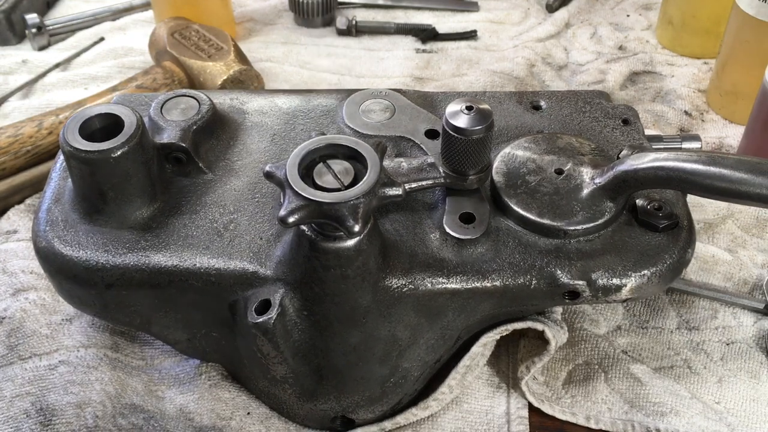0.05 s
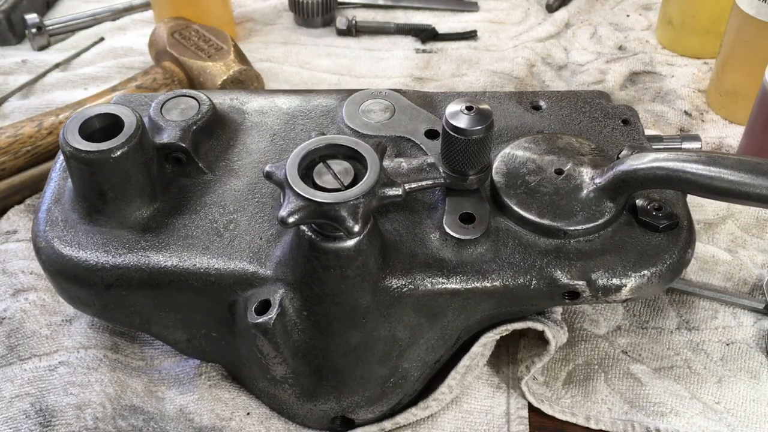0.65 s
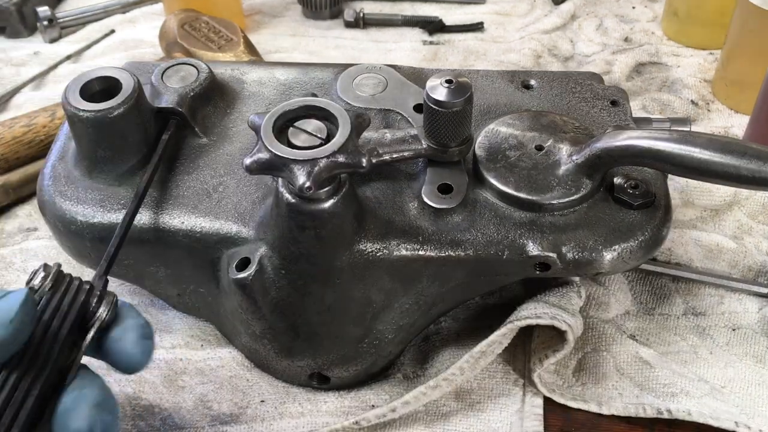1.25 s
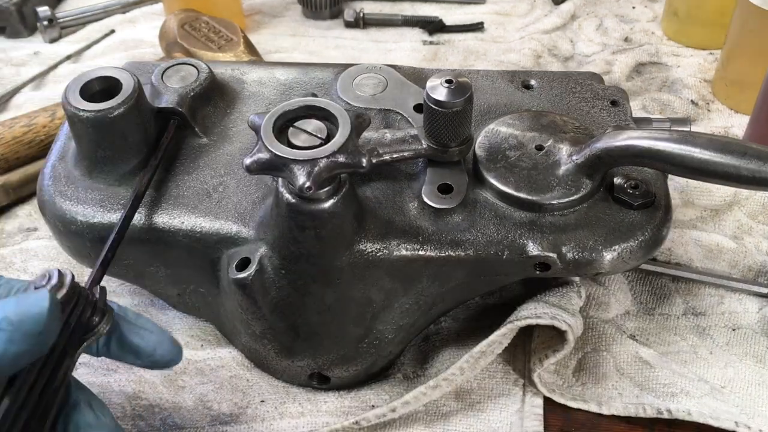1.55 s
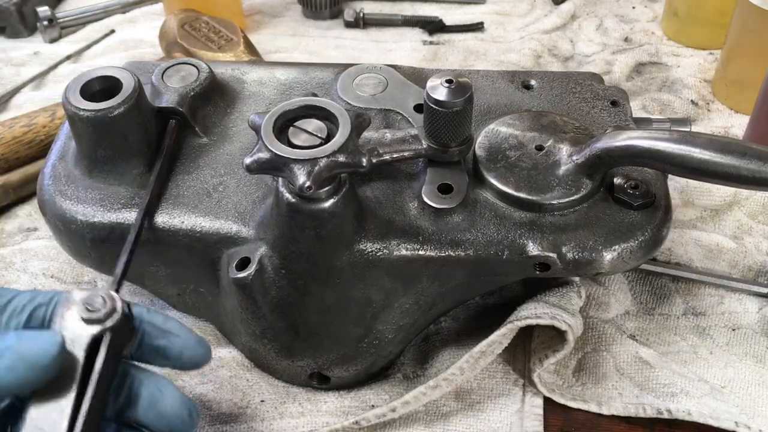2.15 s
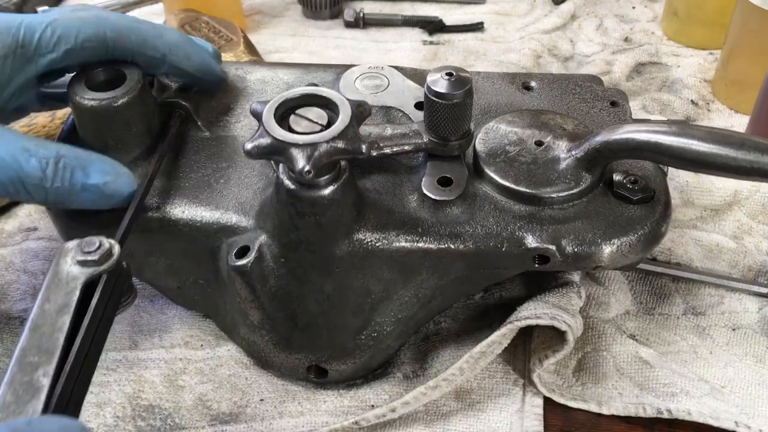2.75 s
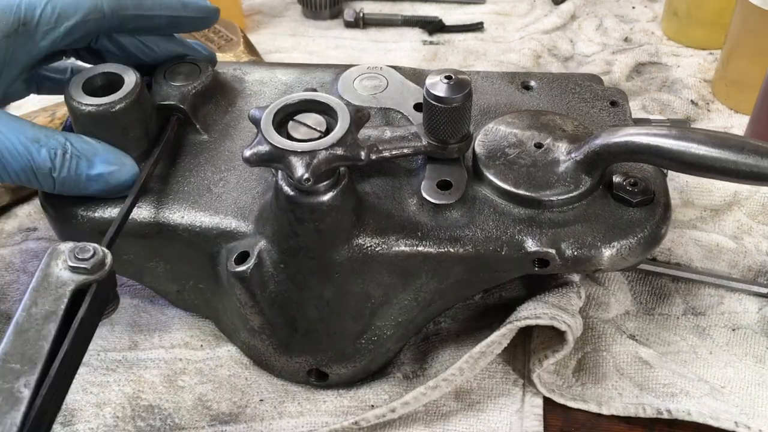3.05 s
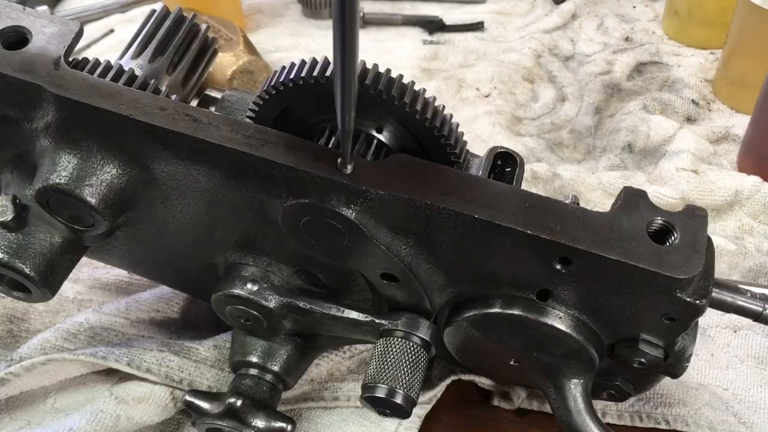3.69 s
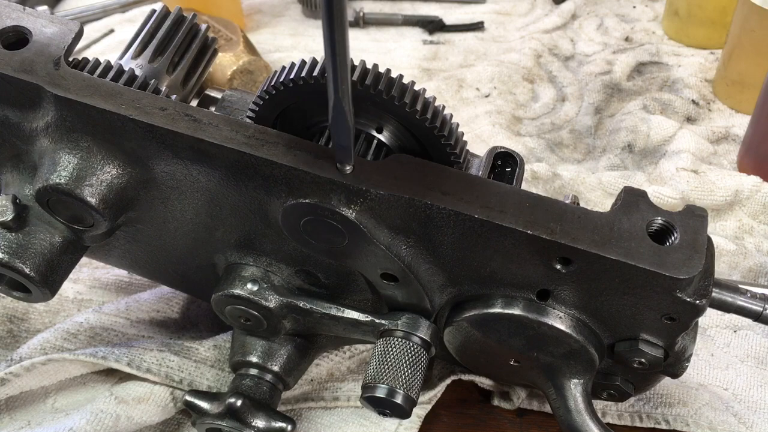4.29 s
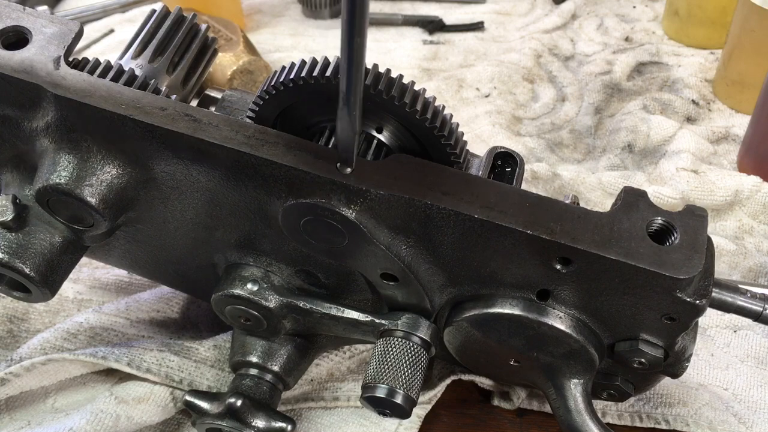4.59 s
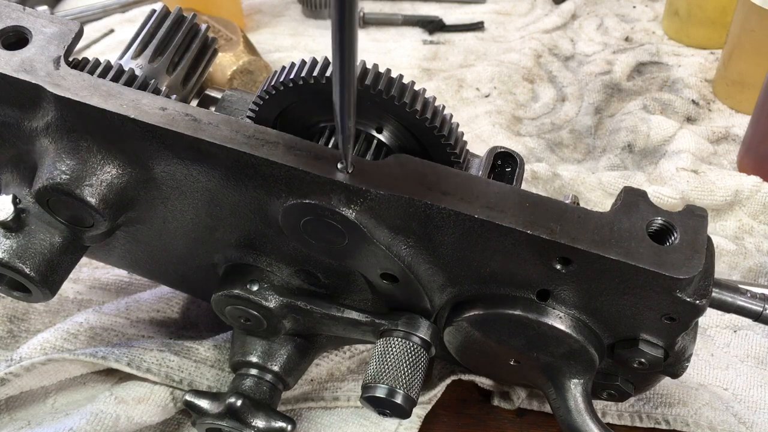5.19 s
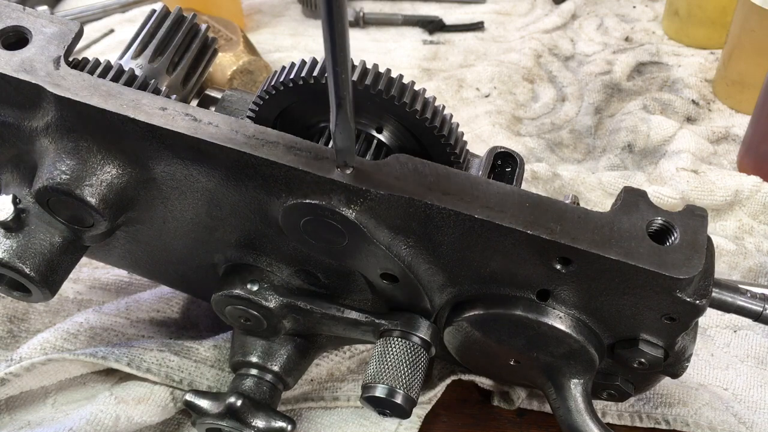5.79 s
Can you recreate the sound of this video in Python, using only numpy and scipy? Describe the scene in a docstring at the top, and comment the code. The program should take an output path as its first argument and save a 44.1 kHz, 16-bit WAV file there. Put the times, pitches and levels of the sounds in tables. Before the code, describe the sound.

A hex key cracks a screw loose in cast iron with one sharp snap, then a tool faintly clicks and scrapes.

```python
"""A tight set screw in a cast-iron gearbox creaks under a folding hex key, then snaps loose.
The thread sticks and slips to make the creak; the snap sets key and iron ringing, and the small
workshop answers. The tool ticks and scrapes, gloved hands rub and slide, and something knocks on
the bench, over a low room hum. The gearbox lies on a cloth, close to the microphone."""
import sys
import numpy as np
from scipy import signal
from scipy.fft import rfft, irfft, next_fast_len
from scipy.io import wavfile
from scipy.ndimage import uniform_filter1d, map_coordinates

SR = 44100
rng = np.random.default_rng(int(sys.argv[2]) if len(sys.argv) > 2 else 0)


def master(y):
    """Save y as 16-bit WAV."""
    cut = np.clip(np.atleast_2d(y).T, -1, 1)
    pcm = np.round(cut * 32767)  # scale
    wavfile.write(sys.argv[1], SR, pcm.astype(np.int16))


N = 261998

# The quick jolts as the screw lets go: delay_s, level_db
JOLTS = [(0, -16), (.0008, -14), (.0024, -19)]
# The tone colour of each crack: pitch_hz, level_db
CRACK_COLOUR = [(100, -39), (400, -24.5), (620, -15.5), (900, -19), (1250, -9.5), (1650, -0.5),
                (2000, -5.5), (2450, -2), (3200, 4), (4200, -4.5), (5000, -3), (6700, -5), (7700, -14),
                (9000, -7.5), (10400, -14), (12500, -6), (16000, -14)]
# The notes of key and iron together: pitch_hz, level_db, fade_s (time to fall by 60 dB)
IRON_NOTES = [(1546, -13, .06), (1725, -11, .04), (1720, -17.5, 0.023), (2341, -27, .28), (2448, 1, 0.053),
              (2572, -14, 0.084), (2944, -11, .025), (3064, -7.5, 0.051), (3300, -16.5, .035),
              (3400, -16.5, .035), (3567, 7, 0.028), (3576, -24.5, 0.41), (3710, -11.5, 0.034),
              (4160, -19, .03), (4780, -5.5, 0.022), (5030, -12, .02), (5980, -8.5, .04), (5800, -35, .3),
              (6055, -16.5, .03), (6520, -9, 0.025), (6557, -30.5, 0.22), (6700, -16.5, 0.036),
              (7246, -27, .022), (8220, -7, .035), (9160, -21.5, .022), (12900, -22, .02)]


def snap(start_s=0.4994, ring_db=-14, crack_fade_s=0.021, build_s=0.00052):
    """Each jolt of the screw cracks; together they set key and iron ringing."""
    out, t = np.zeros(N), clock(SR // 2)
    for delay, db in JOLTS:
        add(out, start_s + delay, amp(db - 60 * t / crack_fade_s) * noise(CRACK_COLOUR, len(t)))
    build_up = 1 - np.exp(-(t / build_s) ** 2)
    add(out, start_s, amp(ring_db) * build_up * ring(IRON_NOTES, t))
    return room(out, echo_db=-14.5, build_s=0.0049)


# The small slips of the thread: start_s, level_db
SLIPS = [(.131, -41), (0.138, -46), (0.142, -39.5), (0.148, -36), (0.151, -32), (0.1561, -32.5),
         (0.1607, -34.5)]
# The notes of the strained key: pitch_hz, level_db, fade_s
KEY_NOTES = [(1688, -8, 0.017), (2103, -8, .025), (2350, 0.5, .024), (2635, -11, 0.039),
             (3670, -13.5, 0.028), (5360, -15, .006)]
# The tone colour of rubbed iron: pitch_hz, level_db
IRON_COLOUR = [(900, -10.5), (1600, -4.5), (2100, 0.5), (2600, -5.5), (3000, -5), (3500, -10), (4200, -8.5),
               (5200, -11), (9000, -26)]


def creak(grit_db=-14, grit_fade_s=0.027, build_s=0.0006):
    """The tight thread sticks and slips, and each slip rings the strained key."""
    out, t = np.zeros(N), clock(SR // 10)
    for start, db in SLIPS:
        grit = amp(grit_db - 60 * t / grit_fade_s) * noise(IRON_COLOUR, len(t))
        key = (1 - np.exp(-t / build_s)) * ring(KEY_NOTES, t)
        add(out, start, amp(db) * (grit + key))
    return room(out, echo_db=-16.5)


# The firmer touches of the tool: start_s, peak_db, ring_db, edge_db
TICKS = [(0.7617, -36, -2.5, -8), (1.04, -34, -25, -8), (1.0904, -34, 1, -9), (1.0949, -30.5, 0, -12),
         (1.3232, -36, -5, -7), (1.3713, -34.5, -9, 6), (1.498, -28.5, -7.5, 9), (1.7111, -34, 4.5, -5),
         (2.0815, -42, -7, -9), (2.3335, -41.5, 4, -3), (3.0651, -45.5, -19, 0), (3.8059, -41, 3, 3.5),
         (4.0816, -33, -10, 0), (4.5687, -36, -17, -13), (4.8964, -38, -10, 0), (5.1499, -35, -11, 3)]
# The notes of the key's shaft, muffled by the hand: pitch_hz, level_db, fade_s
SHAFT_NOTES = [(2700, 3.5, 0.0046), (3220, 3, 0.01), (3960, -5, 0.0052), (5210, -3.5, 0.0052),
               (7450, -3, 0.0093)]
# The tone colours of the tip and of a sharp edge: pitch_hz, level_db
TIP_COLOUR = [(1500, -33), (4500, -5.5), (7000, -1), (10000, -2), (12000, -7), (16000, -23.5)]
EDGE_COLOUR = [(4000, -47), (9500, 4), (11500, 11), (16000, -5)]


def ticks(click_fade_s=0.008, shaft_db=-2, delay_s=0.0011):
    """The tip catches with a click, brighter on a sharp edge, and the shaft rings briefly."""
    out, t = np.zeros(N), clock(SR // 20)
    for start, db, ring_db, edge_db in TICKS + faint_ticks():
        click = noise(TIP_COLOUR, len(t)) + amp(edge_db) * noise(EDGE_COLOUR, len(t))
        shaft = amp(shaft_db + ring_db) * ring(SHAFT_NOTES, t, detune=0.019 * rng.standard_normal())
        tick = amp(-60 * t / click_fade_s) * click + shaft
        add(out, start + delay_s, amp(db) * tick / np.abs(tick).max())
    return room(out, echo_db=-14)


def faint_ticks(count=18, over_stroke_db=7, spread_db=2, ring_db=-9, edge_db=0):
    """Random extra tick rows: the tool jiggles as the hand moves, louder in a firm stroke."""
    rows = []
    for _ in range(count):
        peak, db, rise, fall, _ = STROKES[rng.integers(len(STROKES))]
        start = peak + rng.uniform(-2 * rise, 2 * fall)
        levels = rng.normal([db + over_stroke_db, ring_db, edge_db], spread_db)
        rows.append((start, *levels))
    return [row for row in rows if row[0] > 0]


# The strokes of the glove: peak_s, level_db, rise_s, fall_s, palm_over_fingers_db
STROKES = [(.13, -60.5, 0.047, 0.027, 3.5), (.44, -61.5, 0.084, 0.16, 1.5), (.735, -58, .025, .018, -3),
           (0.823, -47.5, 0.0063, 0.038, -1.5), (1.04, -52, 0.057, 0.13, 1), (1.46, -55, 0.11, 0.092, -2),
           (1.78, -56, 0.025, 0.061, -3.5), (2.02, -63, .04, 0.064, -1.5), (2.295, -61, 0.016, 0.018, -4),
           (2.49, -51.5, 0.034, 0.024, -4), (2.61, -49.5, 0.014, 0.011, 2.5),
           (2.75, -57.5, 0.034, 0.043, -3.5), (2.825, -56.5, 0.015, 0.011, -11),
           (2.93, -61, .035, 0.031, -5), (3.62, -64.5, 0.017, 0.036, 0), (3.8, -54, 0.038, 0.036, -0.5),
           (4.02, -54, 0.07, .14, 0), (4.34, -56, 0.13, 0.032, -2.5), (4.53, -55.5, .035, 0.063, -2.5),
           (4.82, -59.5, 0.072, 0.038, 2), (5.019, -49, 0.017, 0.024, 0), (5.14, -60, 0.041, 0.057, 2),
           (5.35, -62.5, 0.1, 0.11, -0.5), (5.65, -55.5, .027, 0.028, 0.5)]
# The tone colours of the palm and the higher-sounding fingertips: pitch_hz, level_db
PALM_COLOUR = [(2000, -24.5), (4000, -9.5), (4900, -12.5), (5600, -3.5), (6800, -2), (7700, -5), (9200, -1),
               (10400, -5.5), (12500, -23), (16000, -26.5)]
FINGER_COLOUR = [(5000, -28), (8500, -21), (10400, -9.5), (11400, -0.5), (13200, 0), (15500, -0.5),
                 (16000, -7.5)]


def gloves(palm_db=-3, fingers_db=-1, flutter_db=2.8, resting_db=-71.5):
    """Rubber gloves slide on the tool; palm and fingertips each catch on their own."""
    on_palm = on_fingers = amp(resting_db)  # the hand never holds quite still
    for peak, db, rise, fall, grip_db in STROKES:
        stroke = swell(peak, rise, fall)
        on_palm = np.hypot(on_palm, amp(db + grip_db / 2) * stroke)
        on_fingers = np.hypot(on_fingers, amp(db - grip_db / 2) * stroke)
    palm = amp(palm_db) * on_palm * friction(PALM_COLOUR, catch_db=16, per_second=44)
    fingers = amp(fingers_db) * on_fingers * friction(FINGER_COLOUR, catch_db=6.5, per_second=80)
    flutter = amp(flutter_db * wobble(45))
    return room(flutter * (palm + fingers), echo_db=-19)


# Short firm scrapes and softer drags: peak_s, level_db, rise_s, fall_s
SCRAPES = [(.82, -52, .005, .012), (2.511, -43.5, .01, .008), (2.728, -44, 0.008, .013),
           (2.924, -44.5, 0.011, .004), (2.9445, -40.5, .002, .006), (4.228, -39, .011, 0.0055),
           (4.448, -41.5, .01, .012), (4.572, -54, .002, .003), (4.735, -39.5, 0.0049, .005),
           (5.154, -46, 0.0028, 0.0051), (5.37, -44.5, .014, .008), (5.778, -52, .01, 0.0069)]
DRAGS = [(.06, -54, .12, 0.11), (.36, -60.5, 0.093, 0.37), (1.45, -66.5, 0.24, 0.15),
         (2.722, -54.5, 0.0028, 0.015), (4.04, -61.5, 0.079, 0.069), (4.205, -58, 0.0089, .012),
         (4.6, -64, 0.53, .8)]
# The tone colour of a firm scrape: pitch_hz, level_db
SCRAPE_COLOUR = [(800, -22), (2300, -9), (4500, -12), (7000, -4), (10400, -1), (12500, 4.5), (16000, 1)]


def scraping():
    """The tool drags across the iron, with brief firmer scrapes."""
    scrapes = pressure(SCRAPES) * friction(SCRAPE_COLOUR, catch_db=-3, per_second=530)
    drags = pressure(DRAGS) * friction(IRON_COLOUR, catch_db=5.5, per_second=150)
    return room(scrapes + drags, echo_db=-17.5)


# The knocks on the bench: start_s, level_db
KNOCKS = [(2.879, -44), (2.889, -46.5), (4.203, -46), (5.9244, -30.5)]
# The notes of the bench: pitch_hz, level_db, fade_s
BENCH_NOTES = [(118, -15.5, 0.14), (420, -19, .04), (694, -8.5, 0.011), (956, -5, 0.016), (1560, 1, 0.0079),
               (2130, -6.5, 0.0098), (3200, -8, 0.0046)]


def knocks():
    """Something bumps the bench, whose notes die fast and sound dull."""
    out = np.zeros(N)
    for start, db in KNOCKS:
        add(out, start, amp(db) * ring(BENCH_NOTES, clock(SR // 10)))
    return room(out, echo_db=-4.5, build_s=0.0021)


# The tone colour of the room's air: pitch_hz, level_db
AIR_COLOUR = [(12, -59), (20, -32.5), (42, -7), (65, -1.5), (205, -14), (275, -16.5), (418, -18.5),
              (472, -21.5), (666, -18.5), (810, -20), (1060, -20), (2060, -25), (2270, -24.5), (2500, -25),
              (7000, -47), (9100, -82.5), (15400, -120)]


def room_hum(air_db=-55, drone_hz=70.7, drone_db=-64, waver_db=3):
    """Steady air noise and a low, wavering drone."""
    loudness = amp(drone_db + waver_db * wobble(6.5))
    drone = loudness * np.sin(2 * np.pi * drone_hz * clock(N) + wobble(7.6))
    return amp(air_db) * noise(AIR_COLOUR) + drone


# How long the walls keep each pitch alive: pitch_hz, fade_s
WALL_FADES = [(300, 0.29), (1500, .3), (3500, .33), (7000, 0.25), (14000, .17)]


def room(x, echo_db, build_s=0.0027):
    """The workshop adds a soft wash of echoes whose highest pitches die first."""
    hz, t, bands = signal.stft(rng.standard_normal(SR // 2), SR, nperseg=256)
    fade = amp(-60 * t / along(WALL_FADES, hz)[:, None])
    tail = signal.istft(bands * fade, SR, nperseg=256)[1]
    tail *= 1 - np.exp(-(clock(len(tail)) / build_s) ** 2)
    return x + amp(echo_db) * signal.fftconvolve(x, tail / np.linalg.norm(tail))[:N]


def friction(colour, catch_db, per_second, catch_fade_s=0.0043, shift_db=2):
    """Sliding makes a hiss with tiny catches; its colour shifts as the contact moves."""
    catches = (rng.random(N) < per_second / SR) * rng.uniform(0, 1, N) ** 2
    bursts = signal.fftconvolve(catches, amp(-60 * clock(SR // 20) / catch_fade_s))[:N]
    hiss = rng.standard_normal(N) * (1 + amp(catch_db) * bursts)
    bands = signal.stft(hiss, nperseg=256)[2]
    patches = uniform_filter1d(rng.standard_normal(bands.shape), size=4, axis=0)  # smooth over pitch
    patches = uniform_filter1d(patches, size=14, axis=1)  # and over time
    shifting = signal.istft(bands * amp(shift_db * unit(patches)), nperseg=256)[1][:N]
    return coloured(shifting, colour)


def swell(peak_s, rise_s, fall_s, shape=1.64):
    """One push of the hand rises to 1 and falls away; shape 1 is pointed, 2 is rounded."""
    t = clock(N) - peak_s
    return np.exp(-0.5 * np.abs(t / np.where(t < 0, rise_s, fall_s)) ** shape)


def pressure(pushes):
    """Several pushes added together."""
    return sum(amp(db) * swell(peak, rise, fall) for peak, db, rise, fall in pushes)


def ring(notes, t, detune=0):
    """A struck object sounds all its notes at once, each fading at its own speed."""
    return sum((-1) ** k * amp(db - 60 * t / fade_s) * np.sin(2 * np.pi * hz * (1 + detune) * t)
               for k, (hz, db, fade_s) in enumerate(notes))


def noise(colour, length=N):
    """Noise with a given tone colour, at strength 1."""
    return coloured(rng.standard_normal(length), colour)


def coloured(x, colour):
    """Give a sound a tone colour, at strength 1."""
    return unit(filtered(x, lambda hz: amp(along(colour, hz))))


def filtered(x, gain_at):
    """Turn each pitch up or down by gain_at(hz)."""
    size = next_fast_len(len(x) + 8192)
    return irfft(rfft(x, size) * gain_at(np.fft.rfftfreq(size, 1 / SR)), size)[:len(x)]


def along(points, hz):
    """Read between a table's pitches, with octaves evenly spaced."""
    pitches, values = np.transpose(points)
    return np.interp(np.log(hz + 1), np.log(pitches + 1), values)


def wobble(per_second):
    """A smooth curve through random points."""
    points = rng.standard_normal(int(N * per_second / SR) + 4)
    return map_coordinates(points, [np.arange(N) * per_second / SR])


def add(track, start_s, sound):
    """Mix a sound into the track."""
    start = round(start_s * SR)
    track[start:start + len(sound)] += sound[:max(N - start, 0)]


def amp(db):
    """Turn decibels into a multiplier."""
    return 10 ** (np.asarray(db) / 20)


def unit(x):
    """Scale to an average strength (rms) of 1."""
    return x / np.sqrt(np.mean(x ** 2) + 1e-20)


def clock(length):
    """The time of each sample, in seconds."""
    return np.arange(length) / SR


def scene():
    """All the sounds meet at one microphone."""
    return (snap() + creak() + ticks() + gloves() + scraping() + knocks() + room_hum())[None]


# Brief dips in the level: silent_at_s, fade_out_s, fade_in_s
DIPS = [(.905, 0.023, 0.041), (3.739, 0.042, 0.02), (5.905, 0.032, 0.0212)]


def record(dry, top_hz=15900):
    """The level dips three times, and the very highest pitches are cut away."""
    t, gain = clock(N), np.ones(N)
    for silent_at, fade_out, fade_in in DIPS:
        gain *= np.clip(np.maximum((silent_at - t) / fade_out, (t - silent_at) / fade_in), 0, 1)
    return filtered(dry[0] * gain, lambda hz: hz < top_hz)[None]


dry = scene()
out = record(dry)
master(out)
```